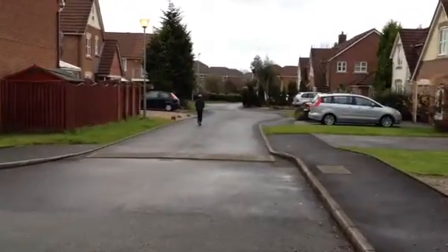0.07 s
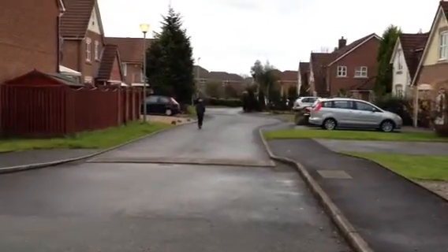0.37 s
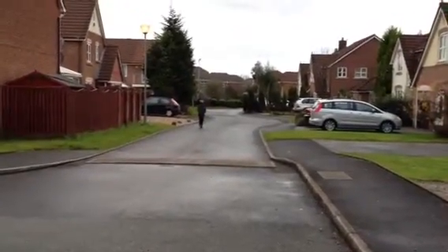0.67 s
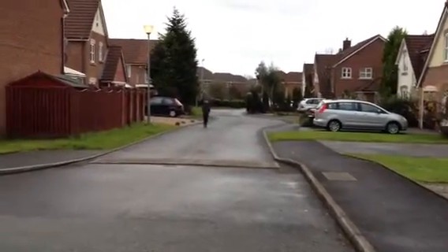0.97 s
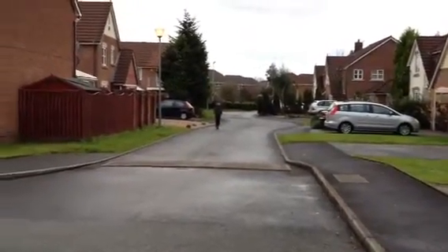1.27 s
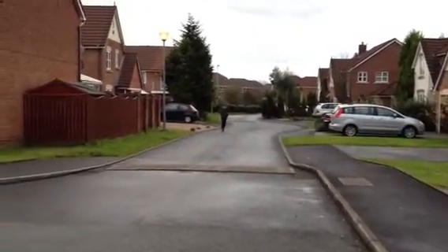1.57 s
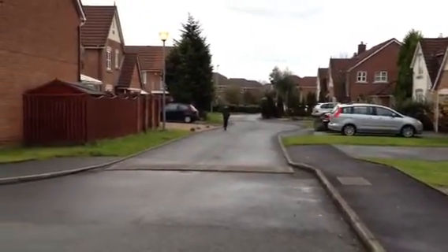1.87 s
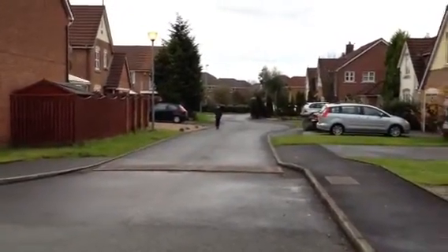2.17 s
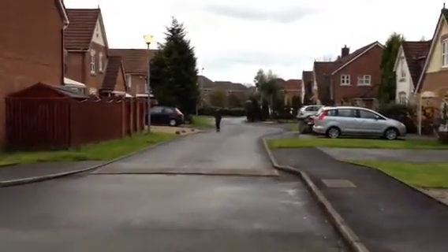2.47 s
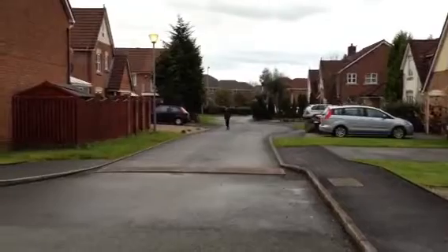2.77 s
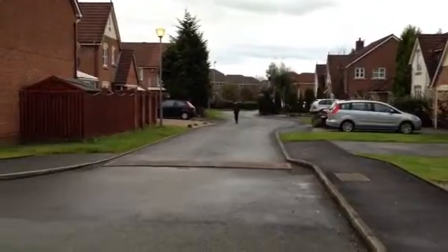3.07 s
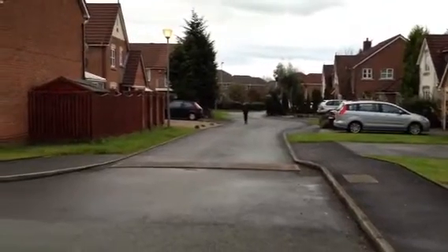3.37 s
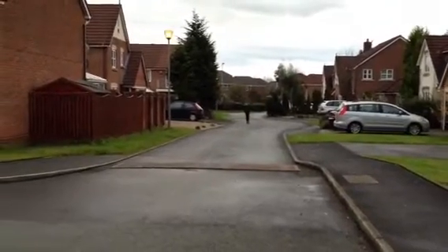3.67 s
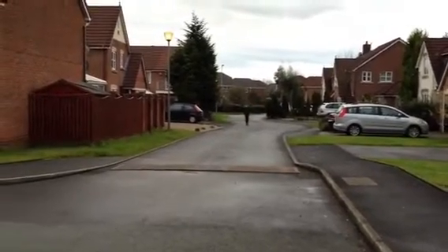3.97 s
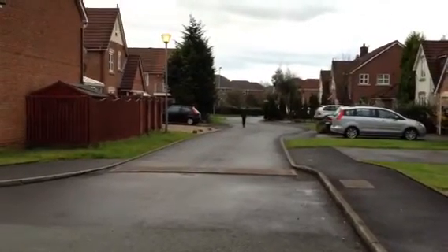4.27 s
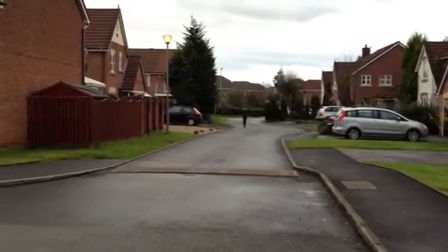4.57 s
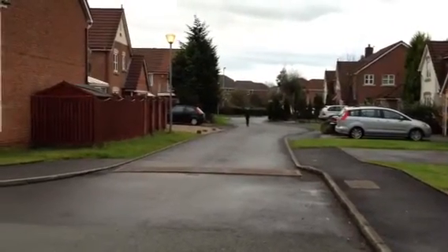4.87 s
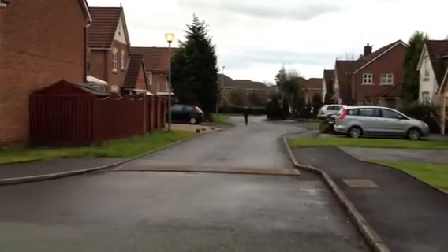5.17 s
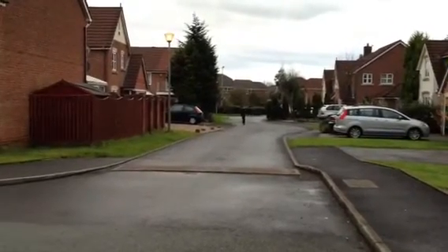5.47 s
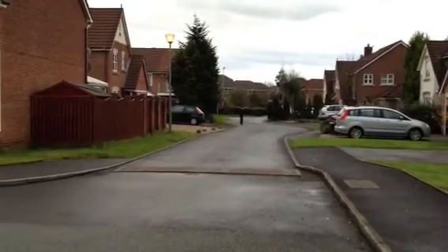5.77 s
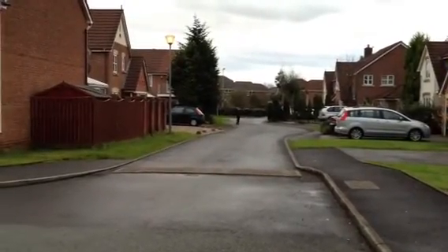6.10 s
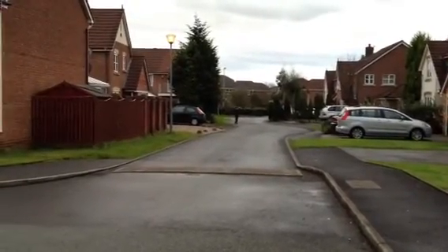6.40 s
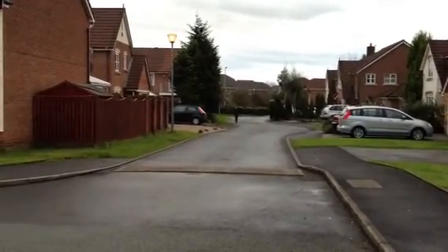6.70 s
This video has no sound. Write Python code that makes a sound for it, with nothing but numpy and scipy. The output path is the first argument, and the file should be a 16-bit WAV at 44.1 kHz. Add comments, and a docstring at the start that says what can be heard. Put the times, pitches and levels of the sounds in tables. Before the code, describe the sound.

Quiet wet street with distant passing cars, low town rumble, breeze in trees and a few soft microphone bumps.

```python
"""A quiet, wet residential street, heard through one hand-held microphone.
From the start, far tyres roar over the town's rumble, gusts hiss in the trees and far motors whine.
A deep hum swells at 0.5 s; distant cars pass from about 2.5 to 5 s. From 3 s the microphone takes soft
bumps, joined by three small ticks, and the breeze starts to die down. At 3.5 s the sound cuts out
briefly. The bumps are strongest near 5.3 s; traffic, a faint whine and weak gusts remain."""
import sys
import numpy as np
from scipy import signal
from scipy.fft import rfft, irfft, next_fast_len
from scipy.io import wavfile
from scipy.ndimage import uniform_filter1d, map_coordinates

SR = 44100
rng = np.random.default_rng(int(sys.argv[2]) if len(sys.argv) > 2 else 0)


def output_pcm(signal):
    """Save a mono or channel-first signal as 16-bit PCM at the path in sys.argv[1].

    Samples are clipped to [-1, 1] before scaling.
    """
    pcm = np.clip(np.atleast_2d(signal).T, -1, 1) * 32767
    wavfile.write(sys.argv[1], SR, np.round(pcm).astype(np.int16))


N = 306054
TIME_S = np.arange(N) / SR


def amp(db):
    """dB to gain."""
    return 10 ** (np.asarray(db) / 20)


def unit_rms(x):
    """Scale to rms 1."""
    return x / np.sqrt(np.mean(x ** 2) + 1e-20)


def wobble(rate_hz):
    """Smooth random curve, rate_hz knots a second."""
    return map_coordinates(rng.standard_normal(400), [TIME_S * rate_hz + 2], mode="mirror")


def swell(t_s, half_s):
    """Gaussian envelope, 1 at t_s."""
    return np.exp(-((TIME_S - t_s) / half_s) ** 2)


def filtered(x, response):
    """Apply a gain given as a function of f/Hz."""
    size = next_fast_len(N + 8192)
    return irfft(rfft(x, size) * response(np.fft.rfftfreq(size, 1 / SR)), size)[:N]


def rush(spectrum, patchy_db):
    """Noise with narrow, drifting patches of gain, shaped by a spectrum; rms 1."""
    bins = signal.stft(rng.standard_normal(N), nperseg=1024)[2]
    patches = uniform_filter1d(rng.standard_normal(bins.shape), size=3, axis=0)
    patches = uniform_filter1d(patches, size=24, axis=1)
    noise = signal.istft(bins * amp(patchy_db * unit_rms(patches)), nperseg=1024)[1][:N]
    knots_hz, knots_db = np.transpose(spectrum)

    def response(hz):
        return amp(np.interp(np.log(hz + 1), np.log(knots_hz), knots_db, left=-120, right=-120))
    return unit_rms(filtered(noise, response))


def noise_band(centre_hz, half_hz):
    """Noise in one resonance; rms 1."""
    return unit_rms(filtered(rng.standard_normal(N), lambda hz: 1 / (1 + ((hz - centre_hz) / half_hz) ** 2)))


# Road noise, tyre roar and wet sizzle spectra: f/Hz, relative level/dB
ROAD_SPECTRUM = [(250, -40), (390, -17.5), (450, -3.5), (580, -0.5), (720, -3), (850, -17), (1200, -29.5)]
ROAR_SPECTRUM = [(500, -41), (700, -11.5), (830, -1.5), (1020, -.5), (1200, -1.5), (1420, -3.5), (1650, -8),
                 (2300, -38.5)]
SIZZLE_SPECTRUM = [(1100, -33), (1400, -10), (1600, -1), (1900, 0.5), (2150, -3), (2450, -11),
                   (2750, -14.5), (3200, -20.5), (4500, -52)]
# Far cars: nearest t/s, half-width/s, road level/dB, roar level/dB, sizzle level/dB
CAR_PASSES = [(2.48, 0.19, -52, -46.5, -48), (2.732, 0.13, -53, -44.5, -50.5),
              (3.554, 0.5, -62.5, -49.5, -50), (4.097, 0.12, -64, -49.5, -47),
              (4.226, 0.16, -56, -40, -54.5), (4.544, 0.17, -71.5, -50.5, -46.2),
              (4.817, 0.072, -75, -47, -52.5)]


def traffic():
    """Tyres on wet roads: cars swell over a steady wash; a louder roar gathers into a hollow note."""
    wash_db = [-52.5 - 0.58 * TIME_S, -49 - 0.017 * TIME_S, -52 - 0.24 * TIME_S]  # road, roar, sizzle
    power = amp(wash_db) ** 2
    falloff = 1.57  # with distance behind the houses
    for t_s, half_s, *levels_db in CAR_PASSES:
        power += amp(levels_db)[:, None] ** 2 / (1 + ((TIME_S - t_s) / half_s) ** 2) ** falloff
    road_gain, roar_gain, sizzle_gain = np.sqrt(power)
    note_share = np.clip(0.05 * (20 * np.log10(roar_gain) + 49), 0.02, 0.7)
    roar = np.sqrt(1 - note_share) * rush(ROAR_SPECTRUM, patchy_db=0)
    note = np.sqrt(note_share) * noise_band(1225, half_hz=97)
    road = amp(0.6 * wobble(10)) * rush(ROAD_SPECTRUM, patchy_db=1.5)
    sizzle = rush(SIZZLE_SPECTRUM, patchy_db=0.23)
    return road_gain * road + roar_gain * (roar + note) + sizzle_gain * sizzle


# Town rumble spectrum: f/Hz, relative level/dB
RUMBLE_SPECTRUM = [(22, -41), (35, -28.5), (50, -21.5), (75, -12), (110, -3), (145, -1), (205, 1.5),
                   (290, -1), (380, -3), (480, -4), (800, -40.5)]
# Rumble swells: t/s, half-width/s, lift/dB
RUMBLE_LIFTS = [(.6, 0.49, 2.4), (4.52, 0.13, 1.6), (6.72, 0.13, 4.5)]


def town_rumble():
    """The town's low, slightly lumpy drone."""
    level_db = -59.5 + sum(db * swell(t_s, half_s) for t_s, half_s, db in RUMBLE_LIFTS)
    return amp(level_db + 0.66 * wobble(12)) * rush(RUMBLE_SPECTRUM, patchy_db=1.45)


# Gusts and lulls: t/s, half-width/s, lift/dB, brightness (0 rustle, 0.5 hiss, 1 fizz)
BREEZE_GUSTS = [(.05, 0.16, 4.5, 0.8), (.15, 0.3, 1, 0.32), (1.1, 0.27, 5.5, 0.4), (1.3, .16, -3, 0.9),
                (1.58, 0.077, 1.5, 0.68), (1.85, .2, -1.5, 0.35), (2.33, .12, 7.5, 1.3),
                (2.72, 0.2, 5.5, 0.75), (2.98, 0.093, 3, 0.39), (3.155, 0.085, 8.5, 0.52),
                (3.22, .08, -0.5, 0), (3.26, .06, 3, 0.83), (3.37, .05, 1.5, 0.15), (3.42, 0.091, 2, 1),
                (3.9, 0.1, -5, 0.47), (4.26, 0.12, 10.5, 0.83), (4.5, 0.2, 5, 0.21), (5.1, 0.099, 3, 0.92),
                (5.22, 0.25, 3, 0.078), (6.35, .16, -2, 0.38), (6.6, 0.08, 4, 0.41), (6.8, 0.15, 4, 0.42)]


def gust_gain(base_db, drop_db, brightness):
    """Gain of one breeze band: gusts of like brightness lift it; it sinks as the air calms."""
    calm_start_s, calm_tau_s, spread = 3.27, 1, 0.36
    calm = 1 - np.exp(-np.maximum(TIME_S - calm_start_s, 0) / calm_tau_s)
    lift_db = sum(db * swell(t_s, half_s) * np.exp(-((gust_brightness - brightness) / spread) ** 2)
                  for t_s, half_s, db, gust_brightness in BREEZE_GUSTS)
    return amp(base_db - drop_db * calm + lift_db + 0.5 * wobble(12))


# Breeze band spectra: f/Hz, relative level/dB
RUSTLE_SPECTRUM = [(1700, -7), (2400, 9.5), (2900, -3), (3250, -1.5), (3800, 1), (4300, -4), (4750, -6),
                   (5400, -6.5), (5700, -2), (6300, -4.5), (6800, -4.5), (8500, -40.5)]
HISS_SPECTRUM = [(5200, -37), (6000, -19.5), (6600, -5), (7200, -0.5), (7600, 5.5), (7900, -3),
                 (8200, -0.5), (8900, -9.5), (9500, -16), (11000, -37)]
FIZZ_SPECTRUM = [(8000, -23), (9000, 1), (9600, -10), (10300, -2.5), (11100, 0.5), (12400, 0.5), (13400, 0),
                 (14600, -6), (15300, -6)]
# Thin whistles: f/Hz, half-width/Hz, base level/dB re rustle
WHISTLE_BANDS = [(3930, 150, -11), (5070, 52, -20), (6120, 110, -17)]
# Whistle swells and dips: t/s, half-width/s, lift/dB
WHISTLE_LIFTS = [(3.92, 0.18, -10), (4.85, 0.41, 5), (5.35, 0.18, 1), (6.05, 0.13, 3), (6.58, .22, -10)]


def breeze():
    """Air moving through trees: dull rustle with thin whistles, hiss, fine fizz."""
    whistles = sum(amp(db) * noise_band(hz, half_hz) for hz, half_hz, db in WHISTLE_BANDS)
    whistles *= amp(sum(db * swell(t_s, half_s) for t_s, half_s, db in WHISTLE_LIFTS))
    rustle = gust_gain(base_db=-55.5, drop_db=8.9, brightness=0)
    rustle *= rush(RUSTLE_SPECTRUM, patchy_db=2.5) + whistles
    hiss = gust_gain(base_db=-60, drop_db=9.4, brightness=0.51)
    hiss *= rush(HISS_SPECTRUM, patchy_db=4.5) + amp(-7) * noise_band(7700, half_hz=190)
    fizz = gust_gain(base_db=-63, drop_db=11.9, brightness=1)
    fizz *= rush(FIZZ_SPECTRUM, patchy_db=2.9)
    return rustle + hiss + fizz


def mic_hiss():
    """The microphone's own steady white noise."""
    return amp(-70) * rng.standard_normal(N)


# Far motors: start t/s, end t/s, start f/Hz, glide/(Hz/s), base level/dB
MOTOR_WHINES = [(0.037, 1.12, 429, 11.5, -59), (1.3, 2.197, 435, 8.5, -57.5), (2.245, 3.3, 435.3, 8, -60.5),
                (3.286, 3.651, 924, 26, -52.5), (3.95, 6.94, 426.6, -3.5, -65.5)]


def motor_whines():
    """Thin gliding tones that waver as the air carries them; the first motor briefly pulls harder."""
    waver_hz, waver_db, rev_db = 3.87, 2.3, 5.4
    whines = np.zeros(N)
    for start_s, end_s, start_hz, glide_hz_per_s, db in MOTOR_WHINES:
        progress = np.clip((TIME_S - start_s) / (end_s - start_s), 0, 1)
        flat_arch = np.abs(np.sin(np.pi * progress)) ** 0.3
        pitch_hz = start_hz + glide_hz_per_s * (TIME_S - start_s) + waver_hz * wobble(30)
        tone = np.sqrt(2) * np.sin(2 * np.pi * np.cumsum(pitch_hz) / SR)
        whines += flat_arch * amp(db + waver_db * wobble(12)) * tone
    return whines * amp(rev_db * swell(t_s=0.65, half_s=0.19))


def engine_hum():
    """A brief, rough, deep hum under the first whine."""
    return amp(-64.5) * swell(t_s=0.5, half_s=0.2) * noise_band(199, half_hz=9)


# Handling bumps: t/s, level/dB, f/Hz, half-width/s
MIC_BUMPS = [(3.0, -52, 130, .007), (3.294, -39.5, 168, 0.0042), (3.3, -44, 214, .004),
             (3.453, -44.5, 151, 0.0058), (4.64, -48.5, 135, .007), (4.696, -35.5, 159, 0.0051),
             (4.9, -50, 135, 0.0051), (5.056, -40, 183, 0.005), (5.172, -57, 145, .006),
             (5.227, -43, 157, .005), (5.28, -32, 158, 0.005), (5.302, -31, 207, 0.0062),
             (5.308, -34, 354, 0.0053), (5.318, -32.5, 140, 0.0066), (5.454, -46, 136, 0.0075),
             (5.646, -53.5, 115, 0.0098)]


def mic_bumps():
    """Soft pushes on the microphone: each a rough low thud over a slower shove of air."""
    shove_hz, shove_db, low_cut_hz = 98, -17, 48
    rough_cycles = 0.068 * wobble(170)
    bumps = np.zeros(N)
    for t_s, db, hz, half_s in MIC_BUMPS:
        offset_s = TIME_S - t_s
        thud = swell(t_s, half_s) * np.cos(2 * np.pi * (hz * offset_s + rough_cycles + rng.random()))
        shove = swell(t_s, half_s=0.012) * np.sin(2 * np.pi * shove_hz * offset_s)
        bumps += amp(db) * (thud + amp(shove_db) * shove)
    return filtered(bumps, lambda hz: hz ** 4 / (hz ** 4 + low_cut_hz ** 4))


# Ticks near the microphone: t/s, level/dB before trim, centre f/Hz
NEAR_TICKS = [(3.357, -42, 4820), (4.305, -41, 13000), (4.441, -50.5, 11500)]


def ticks():
    """Tiny bright snaps, over in a millisecond or two."""
    tau_s, trim_db = 0.0007, -1
    return sum(amp(db + trim_db) * np.exp(-np.abs(TIME_S - t_s) / tau_s) * noise_band(hz, half_hz=2600)
               for t_s, db, hz in NEAR_TICKS)


def dropout_gain():
    """The sound cuts out briefly, leaving a faint tail."""
    stop_s, resume_s, ramp_s, tail_t60_s = 3.497, 3.731, 0.003, 0.07
    gate = np.clip(np.maximum(stop_s - TIME_S, TIME_S - resume_s) / ramp_s + 0.5, 0, 1)
    tail = amp(-17 - 60 * np.abs(TIME_S - stop_s) / tail_t60_s)
    return np.maximum(gate, tail)


def scene():
    """One microphone feeds both channels."""
    street = traffic() + town_rumble() + motor_whines() + engine_hum() + breeze()
    mono = street + mic_bumps() + ticks() + mic_hiss()
    return np.array([mono, mono])


def record(dry):
    """Dropout, then a brick-wall low-pass."""
    cutoff_hz = 15330
    return np.array([filtered(channel * dropout_gain(), lambda hz: hz < cutoff_hz) for channel in dry])


dry = scene()
out = record(dry)
output_pcm(out)
```